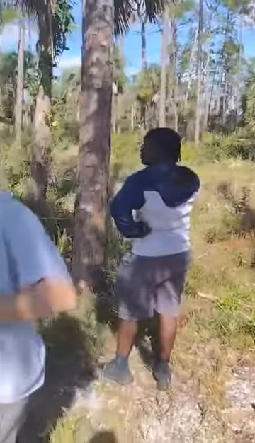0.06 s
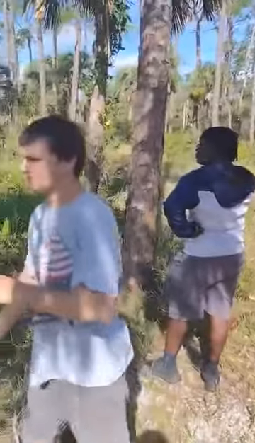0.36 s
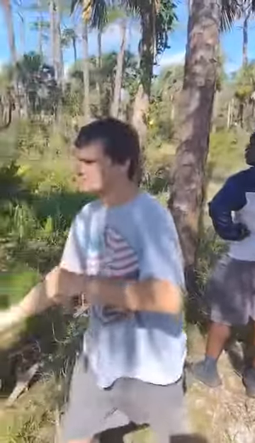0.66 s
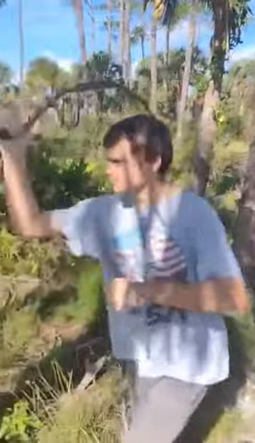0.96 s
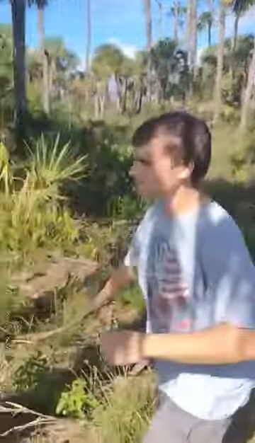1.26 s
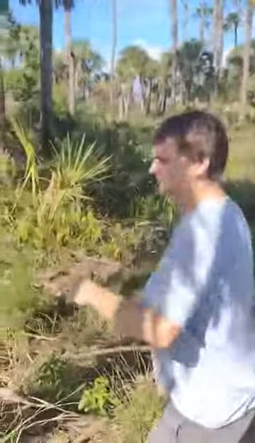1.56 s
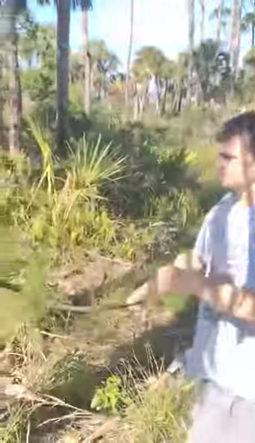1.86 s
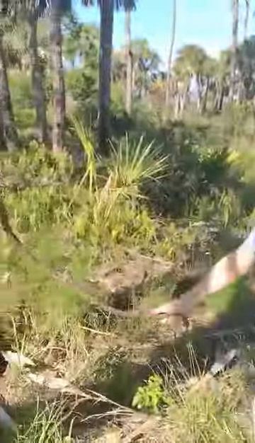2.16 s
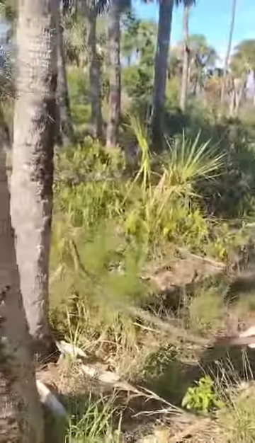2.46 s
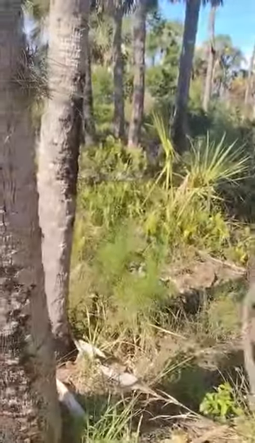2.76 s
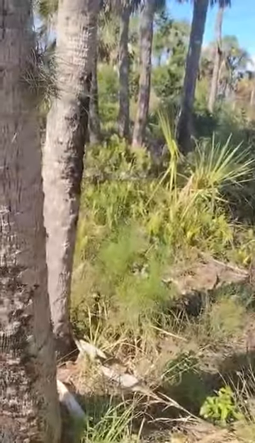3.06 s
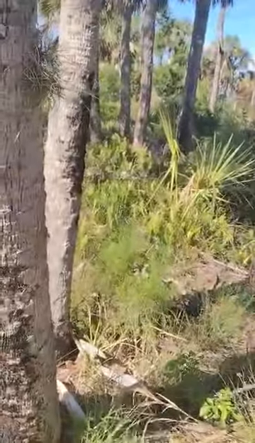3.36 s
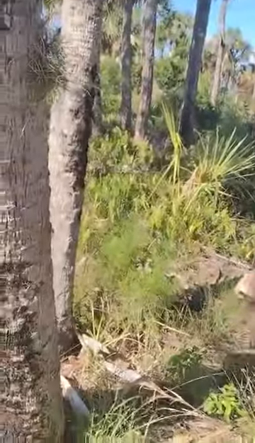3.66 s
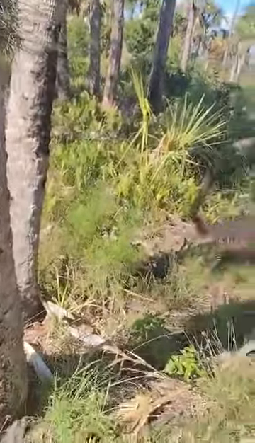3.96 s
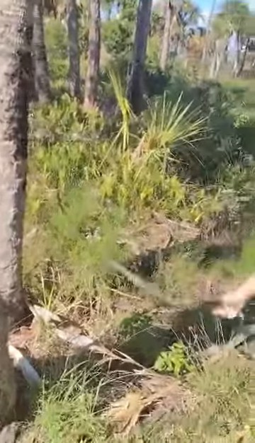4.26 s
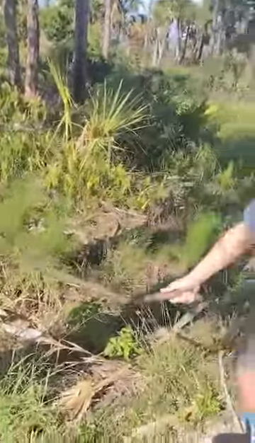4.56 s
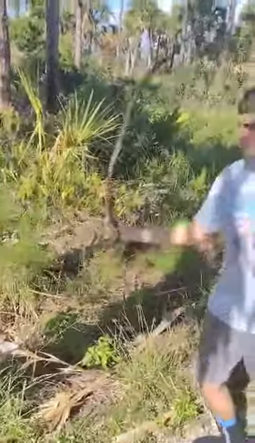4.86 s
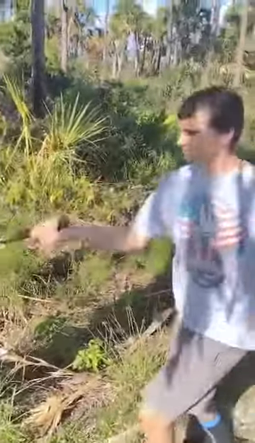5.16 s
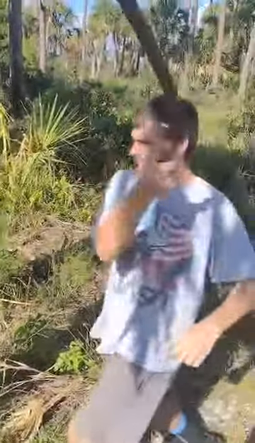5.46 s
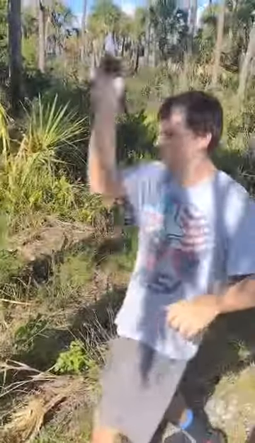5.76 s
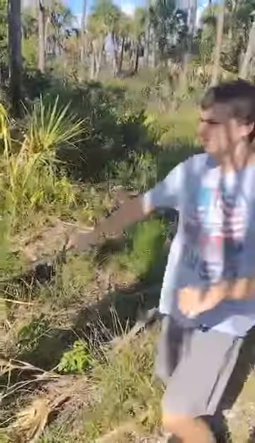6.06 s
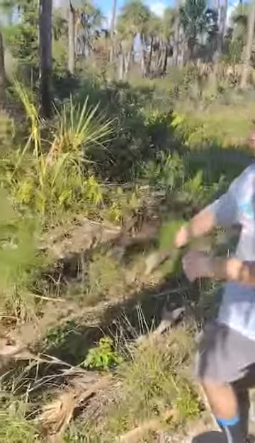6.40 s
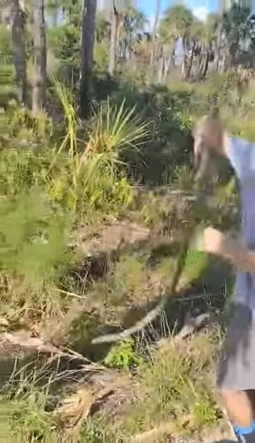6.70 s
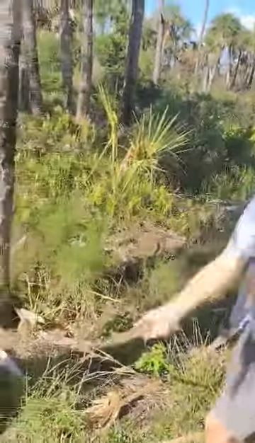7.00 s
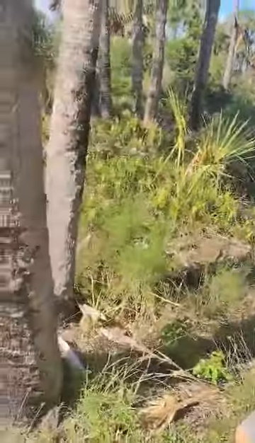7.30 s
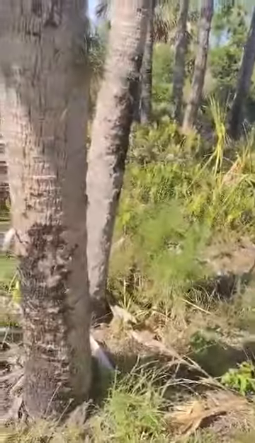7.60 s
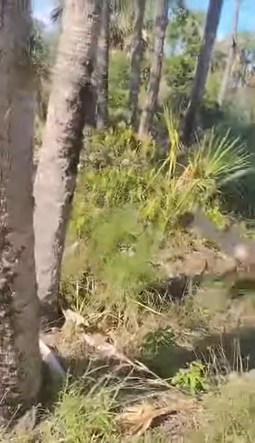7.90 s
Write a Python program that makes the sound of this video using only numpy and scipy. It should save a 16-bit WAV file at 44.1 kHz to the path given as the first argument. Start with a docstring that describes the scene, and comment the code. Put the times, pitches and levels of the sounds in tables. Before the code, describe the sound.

A long dry stick cracks against a palm trunk six times outdoors, while feet shuffle in dry grass and twigs snap.

```python
"""Stick against a palm trunk

Open scrub, a stereo microphone a few metres from a palm. A long dry stick strikes the trunk six times:
each blow cracks the bark, thuds in the trunk and rings the stick, which whips back and slaps twice more.
The near brush and far trees answer. Off to the right, feet shift in dry grass, twigs snap and the stick
swishes through the air, all over a faint distant rumble."""
import sys
import numpy as np
from scipy import signal
from scipy.fft import rfft, irfft, next_fast_len
from scipy.io import wavfile
from scipy.ndimage import uniform_filter1d, map_coordinates

SR = 44100
rng = np.random.default_rng(int(sys.argv[2]) if len(sys.argv) > 2 else 0)


def transcribe(u):
    """Save the signal u as a 16-bit wav file named by the first command-line argument.

    u: samples, shape (n,) or (channels, n), limited to [-1, 1]; the rate is SR.
    q: integer samples, one column per channel.
    """
    v = np.clip(np.atleast_2d(u).T, -1, 1)
    q = np.round(v * 32767).astype(np.int16)
    wavfile.write(sys.argv[1], SR, q)


N = 354563
T = np.arange(SR // 4) / SR  # time axis of one short event, s

# left-right likeness at the microphone, for diffuse and for direct sound: frequency_hz, likeness
DIFFUSE = [(60, 0.46), (200, 0.72), (600, 0.37), (1300, 0.84), (3000, 0.048), (10000, 0.2)]
DIRECT = [(100, 0.98), (400, 0.9), (1200, 0.25), (4000, 0.4), (10000, 0.03)]
# balance of sound from the right, and of the bark's crack: frequency_hz, right_minus_left_db
SIDE_BALANCE = [(200, 0.0), (1500, 0.5), (4000, 5.0), (12000, 5.5)]
BARK_BALANCE = [(300, 2), (2000, -3), (3500, 0.5), (5500, 4), (12000, 4)]

# spectra of the noisy sources and of the two echoes: frequency_hz, density_db
AIR_COLOUR = [(12, -34), (20, -8), (95, 10), (346, -8.5), (1650, -15.5), (2060, -6.5), (4430, -12.5),
              (6320, -14), (9800, -25.5), (12500, -37), (14000, -50.5)]
SCUFF_COLOUR = [(120, -7.5), (250, 1), (380, 3.5), (800, 1), (1100, -0.5), (1600, -59), (3000, -49)]
GRASS_COLOUR = [(600, -0.5), (1300, 4), (2300, 5.5), (3500, 5.5), (5000, -3.5), (8000, -35.5)]
LEAF_COLOUR = [(2500, -18), (4500, -0.5), (6400, 3), (8000, -1.5), (9800, -14), (12000, -0.5), (14000, -6)]
BARK_COLOUR = [(100, -23), (300, -6.5), (700, 2.5), (1200, 2), (2200, 0.5), (3300, -1.5), (5200, -2.5),
               (6600, 0.5), (7800, -5.5), (9800, -11.5), (12000, -9.5), (14000, -16)]
SWISH_COLOUR = [(200, -5.5), (500, -10.5), (850, 3.0), (1400, -2.5), (3000, -2.5), (7000, -15),
                (10000, -19.0), (13000, -5.5)]
BRUSH_COLOUR = [(200, -21.5), (2500, 6.0), (12000, -5.0)]
TREES_COLOUR = [(100, -12.0), (400, 11.5), (650, -3.5), (900, 7.0), (1500, 8), (3000, 9.0), (12000, 5.5)]
# decay of the scatter from the near brush and the far trees: frequency_hz, t60_s
BRUSH_DECAY = [(200, 0.39), (900, 0.14), (3000, 0.1), (7000, 0.12), (12000, 0.14)]
TREES_DECAY = [(100, 0.37), (400, 5.7), (900, 0.83), (1500, 1.07), (6000, 1.1), (12000, 0.43)]

# Levels in the tables below are relative within a column; each source adds its own gain.
# brush that never quite settles between strides: time_s, low_rustle_db, high_rustle_db
BRUSH_STIR = [(0.0, -73, -66), (1.03, -78, -71.5), (1.21, -64.5, -68), (1.48, -73.5, -83.5),
              (1.99, -81, -81), (2.44, -70.5, -74), (2.98, -81, -73.5), (3.24, -65, -64.5),
              (3.52, -76.5, -82), (4.16, -69, -61.5), (4.43, -72, -72), (6.0, -66.5, -70), (6.67, -75, -70),
              (7.12, -65.5, -70), (7.75, -71.5, -61), (8.04, -65, -65.5)]
# a foot drags through the brush: start_s, length_s, scuff_db, grass_db, leaf_db
FOOT_DRAGS = [(0.12, 0.047, -81, -59, -57.5), (0.247, 0.059, -67, -58, -59.5),
              (0.623, .06, -78, -63.5, -66), (1.676, 0.11, -86, -71, -74), (2.146, 0.11, -71.5, -61, -64.5),
              (2.38, 0.11, -82, -63.5, -94), (2.537, 0.12, -71, -59, -63.5),
              (3.215, 0.051, -83, -65, -57.5), (3.75, 0.032, -70.5, -68, -67),
              (4.034, 0.071, -72, -71, -72), (4.547, 0.093, -75, -64.5, -75),
              (5.69, 0.21, -63, -61.5, -64.5), (5.964, 0.037, -68, -58, -65),
              (6.149, 0.17, -68.5, -59, -65), (7.538, 0.11, -73, -83, -59)]
# footfalls and dull taps on sandy ground: start_s, level_db, crunch_db, pitch_hz
FOOTFALLS = [(0.047, -48.5, -13, 408), (0.267, -47.5, 4.5, 354), (0.371, -47.5, -20, 590),
             (0.663, -48, 5, 525), (1.447, -47.5, -4, 684), (2.162, -45, 3, 195), (2.232, -45.5, 1, 410),
             (2.611, -37.5, 2, 360), (3.92, -45, 6, 362), (4.095, -48, -12, 900), (4.131, -41.5, -13, 920),
             (4.286, -48, -22, 770), (4.483, -46.5, -12, 440), (5.171, -37.5, 7, 226), (5.489, -48, 7, 422),
             (5.796, -45, 1, 493), (6.162, -38.5, 4, 404), (6.325, -44, -16, 584)]
# twigs and bits of bark snapping: start_s, level_db, pitch_hz
TWIG_SNAPS = [(0.0505, -37, 2500), (0.166, -29.5, 6500), (0.5734, -41, 2520), (0.6253, -41, 2710),
              (0.7973, -33.5, 5970), (1.4473, -40.5, 4800), (2.0279, -45.5, 2750), (2.451, -48.5, 2720),
              (2.58, -35, 2380), (2.8424, -40, 2700), (2.9324, -44, 2830), (3.1725, -30, 8700),
              (3.3013, -28, 4000), (3.3653, -38.5, 3330), (3.4694, -42, 3150), (4.227, -44, 3240),
              (5.4051, -36, 2520), (5.644, -40.5, 2610), (6.622, -43, 10600), (7.152, -40, 3100),
              (7.2956, -36.5, 3900)]
# the stick rushing through air and grass: centre_s, level_db, half_length_s
STICK_SWINGS = [(1.048, -46.5, 0.011), (4.214, -40, 0.018)]

# modes of the wood: pitch_hz, level_db, t60_s
TRUNK_MODES = [(139.6, -5, 0.19), (169, -0.5, 0.055), (288, 1.5, 0.13), (351, 0.5, 0.061),
               (446, -25, 0.046), (660, -1, 0.048)]  # the fibrous trunk
STICK_MODES = [(780, -16, 0.069), (906, 4.5, 0.07), (1050, -14.5, 0.12)]  # the stick's main ring, damped by the hand
STICK_OVERTONES = [(1410, -6, 0.0069), (1463, -2, 0.085), (1590, -12, 0.043), (1915, -17.5, 0.21),
                   (2125, -1.5, 0.025), (2980, -7.5, 0.059), (3350, -12.5, 0.035), (3820, 3.5, 0.012)]  # their strength depends on where along the stick the blow lands
# the stick strikes the trunk; the grip scales its pitch:
# start_s, crack_db, thud_db, ring_db, overtone_db, spot_hz, spot_lift_db, grip_ratio, downswing_db
STRIKES = [(1.092, -22.5, -41, -48, -35, 5900, 6, 0.97, -52),
           (3.123, -15, -39.5, -46.5, -48, 4530, 9.5, 1, -54.5),
           (5.1045, -17, -38, -33.5, -51, 449, 17, 1.016, -61.5),
           (6.909, -13.5, -40, -36.5, -39.5, 5650, 8, 0.98, -54.5),
           (7.438, -18, -42.5, -42, -35, 3940, 4.5, 0.985, -86),
           (7.9242, -15.5, -43.5, -29.5, -27, 4870, 11.5, 1.005, -73)]
# the stick whips back after each blow, with losses per rebound:
# first_flight_s, next_flight_ratio, crack_loss_db, wood_loss_db, slap_hz, slap_lift_db
REBOUNDS = [(0.012, .62, 0.3, 2.5, 2500, -3), (.012, 1.25, 7.5, 5, 8300, 2),
            (.0115, 1.9, 2.5, 11.5, 3400, 9), (0.016, .31, 7, 6, 11000, 9), (.0159, 0.41, 5, 2.5, 1000, 4),
            (.0081, 1.1, 2, 3.5, 11700, 11)]
# overtones at each contact, strongest on the first rebound, at the springy tip: offset_db
CONTACT_OVERTONES = [0, 3, -15.5]


def amp(db):
    """Decibels to gain."""
    return 10 ** (np.asarray(db) / 20)


def unit(x):
    """Scale to rms 1."""
    return x / np.sqrt(np.mean(x ** 2) + 1e-20)


def along(points, hz):
    """Read (frequency_hz, value) points on a log axis."""
    knots_hz, values = np.transpose(points)
    return np.interp(np.log(hz + 1), np.log(knots_hz + 1), values)


def fade(t, t60):
    """Exponential decay that loses 60 dB in t60."""
    return np.exp(-np.log(1000) * t / t60)


def wobble(rate):
    """A smooth random curve, rate knots a second."""
    return map_coordinates(rng.standard_normal(int(N * rate / SR) + 4), [np.arange(N) * rate / SR])


def add(track, start_s, sound):
    """Mix a sound into a track."""
    start = max(round(start_s * SR), 0)
    track[:, start:start + sound.shape[1]] += sound[:, :max(N - start, 0)]


def filtered(x, response):
    """Apply a frequency response to x."""
    size = x.shape[-1]
    padded = next_fast_len(size + 2048, real=True)
    return irfft(rfft(x, padded) * response(np.fft.rfftfreq(padded, 1 / SR)), padded)[..., :size]


def stereo(pair, colour, likeness):
    """Two unrelated signals become a coloured, partly alike stereo pair of rms 1."""
    def response(hz):
        turn = np.arccos(np.clip(along(likeness, hz), -1, 1)) / 2
        return amp(along(colour, hz)) * [np.cos(turn), np.sin(turn)]
    mid, side = filtered(pair, response)
    return unit(np.array([mid + side, mid - side]))


def noise(colour, likeness, size=len(T)):
    """Coloured stereo noise of rms 1."""
    return stereo(rng.standard_normal((2, size)), colour, likeness)


def crackle(per_second, spread_db, size=len(T)):
    """Dry fibres giving way: a hiss with sparse fractures of varying size, two channels of rms 1."""
    happens = rng.random(size) < per_second / SR
    fractures = happens * amp(spread_db * np.clip(rng.standard_normal(size), -2, 2))
    bursts = signal.fftconvolve(fractures, fade(T[:256], 0.0012))[:size]
    return unit((1.2 + 0.43 * unit(bursts)) * rng.standard_normal((2, size)))


def distant_air():
    """The faint, diffuse rumble of open country."""
    return amp(-70) * noise(AIR_COLOUR, DIFFUSE, N)


def foot_drag(length_s, attack_s=0.004, release_t60_s=0.32):
    """Envelope of one push through the brush: stalks bend quickly and spring back slowly."""
    t = np.arange(SR) / SR
    return (1 - np.exp(-t / attack_s)) * fade(np.maximum(t - length_s, 0), release_t60_s)


def movement(downswing_rise_s=0.061):
    """Gains of ground scuff, dry grass and leaf hiss: a slow stir, plus each drag and downswing."""
    t = np.arange(N) / SR
    knots_s, *levels = np.transpose(BRUSH_STIR)
    low_db, high_db = [np.interp(t, knots_s, level) for level in levels]
    power = amp([low_db - 1, high_db + 2, high_db + 0.5]) ** 2
    for start_s, length_s, *layer_db in FOOT_DRAGS:
        add(power, start_s, np.outer(amp(layer_db), foot_drag(length_s)) ** 2)
    swell = np.exp((T - T[-1]) / downswing_rise_s)
    for strike_s, *_, db in STRIKES:
        add(power, strike_s - T[-1], np.outer(amp([db - 7, db, db - 0.5]), swell) ** 2)
    return np.sqrt(power)


def patchy(x, depth_db):
    """Different stalks sound at different moments, so the colour keeps shifting."""
    spectra = signal.stft(x, nperseg=512)[2]
    patches = uniform_filter1d(rng.standard_normal(spectra.shape[1:]), size=12, axis=0)
    patches = uniform_filter1d(patches, size=7, axis=1)
    return unit(signal.istft(spectra * amp(depth_db * unit(patches)), nperseg=512)[1][:, :N])


def rustle(scuff_gain, grass_gain, leaf_gain):
    """Shifting feet scuff the ground and bend dry stalks, which give way in many tiny fractures."""
    bunches = amp(1.52 * wobble(70))  # stalks break in quick bunches
    fractures = patchy(crackle(per_second=100, spread_db=6.5, size=N), depth_db=4)
    scuff = scuff_gain * amp(2.5 * wobble(30)) * noise(SCUFF_COLOUR, DIFFUSE, N)
    grass = grass_gain * bunches * stereo(fractures, GRASS_COLOUR, DIFFUSE)
    leaves = leaf_gain * bunches * stereo(fractures[::-1], LEAF_COLOUR, DIFFUSE)
    return scuff + grass + leaves


def stalks(grass_gain, per_second=12):
    """Single dry stalks tick at random, the louder the more the grass is stirred."""
    out = np.zeros((2, N))
    t = T[:2048]
    for when, pitch, force in rng.random((int(per_second * N / SR), 3)):
        hz = 2100 * 2.7 ** pitch
        tick = fade(t, 0.018) * noise([(hz / 4, -18), (hz, 0), (hz * 3, -12)], DIRECT, len(t))
        add(out, when * N / SR, grass_gain[int(when * N)] * amp(9 * (force + 0.5)) * tick)
    return out


def steps(heel_t60_s=0.0086, sole_t60_s=0.072):
    """The heel lands hard, then the sole settles into sand with a crunch of dead grass on top."""
    out = np.zeros((2, N))
    weight = (1 - np.exp(-T / 0.00032)) * (fade(T, heel_t60_s) + amp(-5.5) * fade(T, sole_t60_s))
    for start_s, db, crunch_db, hz in FOOTFALLS:
        colour = [(hz / 8, -24), (hz / 3, -10), (hz, 0), (hz * 2, -5), (hz * 4, -20), (hz * 10, -45)]
        thump = noise(colour, DIRECT)
        crunch = amp(crunch_db - 7) * stereo(crackle(per_second=450, spread_db=16), GRASS_COLOUR, DIFFUSE)
        add(out, start_s + 0.004, amp(db - 1.5) * weight * (thump + crunch))
    return out


def twigs(splinter_span_s=0.056):
    """A twig breaks with a broad tick round its own pitch; fibres and three smaller snaps follow."""
    out = np.zeros((2, N))
    t = T[:1024]
    for start_s, db, hz in TWIG_SNAPS:
        colour = [(hz / 8, -24), (hz / 2, -9), (hz, 0), (hz * 2, -7), (hz * 4, -15)]
        tick = fade(T, 0.011) * noise(colour, DIRECT)
        fibres = amp(-11) * fade(T, 0.048) * stereo(crackle(per_second=160, spread_db=-2), colour, DIFFUSE)
        add(out, start_s + 0.004, amp(db - 4.5) * (tick + fibres))
        for late in rng.random(size=3):
            splinter = fade(t, 0.011) * noise(colour, DIRECT, len(t))
            add(out, start_s + 0.0033 + late * splinter_span_s, amp(db - 19 - 4.1 * late) * splinter)
    return out


def swishes():
    """The rush of a swing swells and dies with the speed of the stick's tip."""
    out = np.zeros((2, N))
    for centre_s, db, half_length_s in STICK_SWINGS:
        speed = np.exp(-((T - T.mean()) / half_length_s) ** 2 / 2)
        rush = stereo(crackle(per_second=1800, spread_db=20), SWISH_COLOUR, DIFFUSE)
        add(out, centre_s - T.mean(), amp(db) * speed * rush)
    return out


def from_right(x, lag_s=0.0003124):
    """Sound from the right reaches the microphone's left port later, its treble shaded by the housing."""
    side = np.array([[-0.5], [0.5]])
    return filtered(x, lambda hz: np.exp(2j * np.pi * hz * lag_s * side)
                    * amp(along(SIDE_BALANCE, hz) * side))


def echo(x, decay, colour, size):
    """Vegetation scatters x: a diffuse tail, size samples long, each band dying at its own speed."""
    hz, t, spectra = signal.stft(noise(colour, DIFFUSE, size), SR, nperseg=256)
    tail = signal.istft(spectra * fade(t, along(decay, hz)[:, None]), SR, nperseg=256)[1]
    tail *= 1 - np.exp(-np.arange(tail.shape[1]) / SR / 0.0017)  # the first scatter needs a few ms
    return signal.fftconvolve(x, tail / np.linalg.norm(tail[0]), axes=1)[:, :N]


def bark_crack(spot_hz, lift_db, lift_octaves=0.33, crush_s=0.0024):
    """Soft bark yields, snaps and keeps tearing, its colour lifted round the struck spot's pitch."""
    grid_hz = np.geomspace(60, 16000, 96)
    spot_db = lift_db * np.exp(-(np.log2(grid_hz / spot_hz) / lift_octaves) ** 2)
    colour = np.transpose([grid_hz, along(BARK_COLOUR, grid_hz) + spot_db])
    snap = amp(3.5) * fade(np.abs(T - crush_s), np.where(T < crush_s, 0.0053, 0.014))
    tearing = amp(-17) * fade(T, 0.13) * (T > crush_s)
    crack = snap * noise(colour, DIRECT)
    crack += tearing * stereo(crackle(per_second=210, spread_db=4), colour, DIRECT)
    return filtered(crack, lambda hz: amp(along(BARK_BALANCE, hz) * [[-0.5], [0.5]]))


def wood_ring(modes, held_s, phase_rad, left_db, tuning=1):
    """Modes ring until the next contact damps them; the two ports hear them out of step and unequally."""
    hz, db, t60 = np.transpose(modes)[:, :, None]
    t = T[:4096]
    scatter_db = rng.standard_normal((len(modes), 1))
    sign = (-1) ** np.arange(len(modes))[:, None]  # neighbouring modes swing opposite ways
    attack = 1 - np.exp(-t / 0.00067)
    damping = fade(np.maximum(t - held_s, 0), 0.012)
    envelope = sign * amp(db + scatter_db) * fade(t, t60) * attack * damping
    phase = 2 * np.pi * hz * tuning * t
    pair = [amp(side * left_db) * (envelope * np.cos(phase - side * sign * phase_rad)).sum(0)
            for side in (1, -1)]
    return np.pad(pair, [(0, 0), (0, len(T) - len(t))])


def contacts():
    """Every blow lands once and rebounds twice, losing crack, thud and ring: one row per contact."""
    rows = []
    for strike, rebound in zip(STRIKES, REBOUNDS):
        start_s, crack_db, thud_db, ring_db, overtone_db, *first_spot, grip, _ = strike
        flight_s, flight_ratio, crack_loss_db, wood_loss_db, slap_hz, slap_lift_db = rebound
        for bounce, offset_db in enumerate(CONTACT_OVERTONES):
            spot = (slap_hz, slap_lift_db / bounce) if bounce else first_spot
            rows.append((start_s, crack_db - bounce * crack_loss_db, thud_db - bounce * wood_loss_db,
                         ring_db - bounce * wood_loss_db, overtone_db + offset_db, *spot, grip))
            start_s += flight_s * flight_ratio ** bounce
    return rows


def blows():
    """Each contact crushes bark, thumps the trunk and rings the stick; brush and trees scatter it."""
    out = np.zeros((2, N))
    hits = contacts()
    gaps_s = np.diff(np.transpose(hits)[0], append=N / SR)
    for hit, held_s in zip(hits, gaps_s):
        start_s, crack_db, thud_db, ring_db, overtone_db, spot_hz, lift_db, grip = hit
        crack = amp(crack_db - 4.5) * bark_crack(spot_hz, lift_db)
        thud = wood_ring(TRUNK_MODES, held_s, phase_rad=0.08, left_db=-1)
        ring = wood_ring(STICK_MODES, held_s, phase_rad=0.51, left_db=2.4, tuning=grip)
        overtones = wood_ring(STICK_OVERTONES, held_s, phase_rad=0.59, left_db=0.6, tuning=grip)
        wood = amp(thud_db - 1.5) * thud + amp(ring_db + 9.5) * ring + amp(overtone_db + 4) * overtones
        add(out, start_s - 0.0018, crack)  # the bark gives before the wood sounds
        add(out, start_s, wood)
        add(out, start_s, echo(amp(-10) * crack + amp(-14.5) * wood, BRUSH_DECAY, BRUSH_COLOUR, size=6144))
    return out + amp(-27.5) * echo(out, TREES_DECAY, TREES_COLOUR, size=SR)


def scene():
    """Blows a few metres ahead of the microphone, footwork to the right, quiet scrub all round."""
    scuff_gain, grass_gain, leaf_gain = movement()
    footwork = twigs() + steps() + rustle(scuff_gain, grass_gain, leaf_gain)
    right_side = from_right(footwork + swishes() + stalks(grass_gain))
    return blows() + right_side + distant_air()


def record(dry, low_cut_hz=35, top_hz=13350):
    """The microphone thins the deep bass, and the treble ends steeply at the band limit."""
    thinned = filtered(dry, lambda hz: 1j * hz / (low_cut_hz + 1j * hz))
    return filtered(thinned, lambda hz: 1 / np.sqrt(1 + (hz / top_hz) ** 90))


dry = scene()
out = record(dry)
transcribe(out)
```